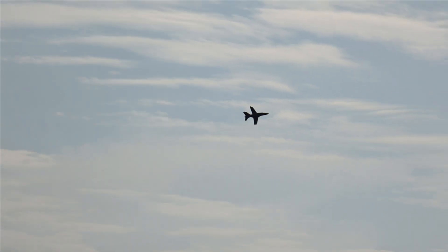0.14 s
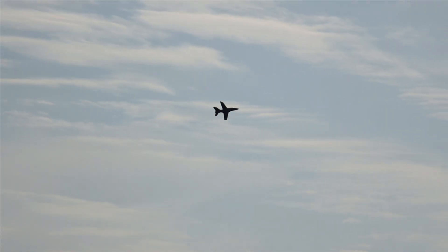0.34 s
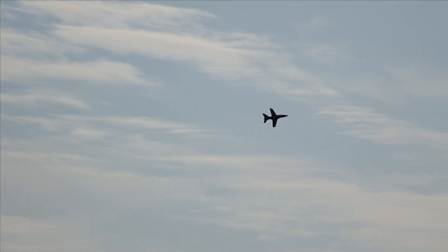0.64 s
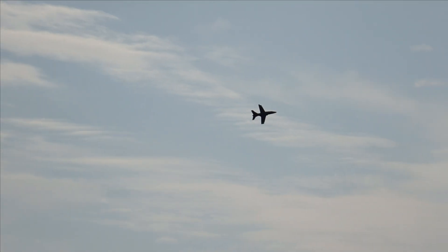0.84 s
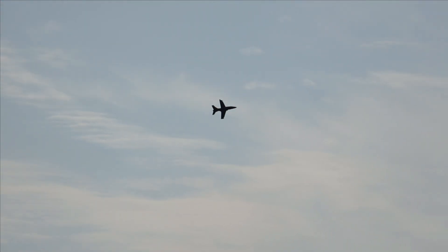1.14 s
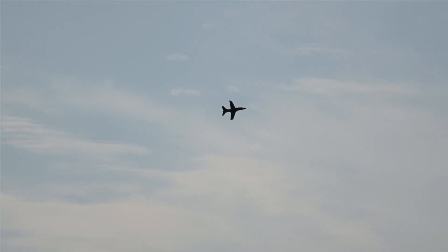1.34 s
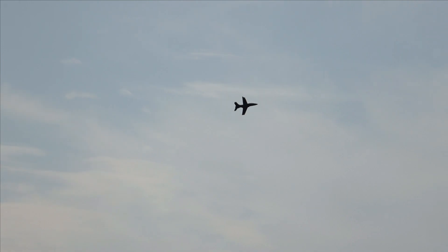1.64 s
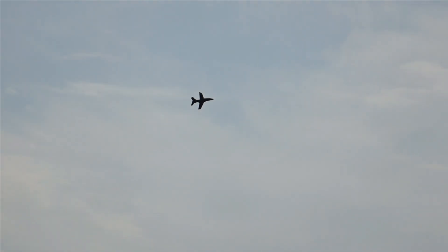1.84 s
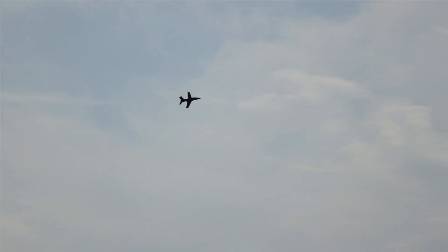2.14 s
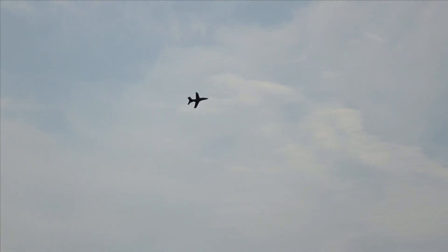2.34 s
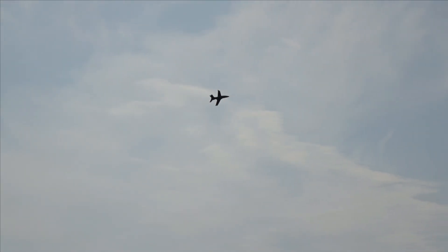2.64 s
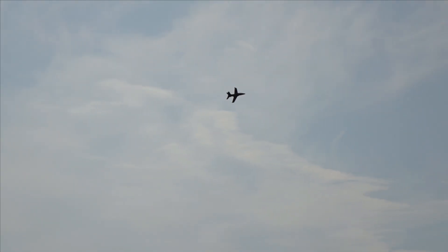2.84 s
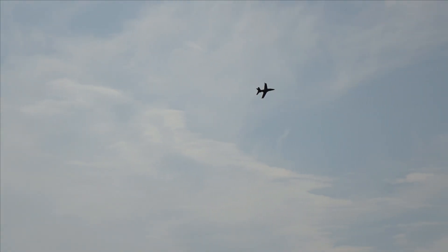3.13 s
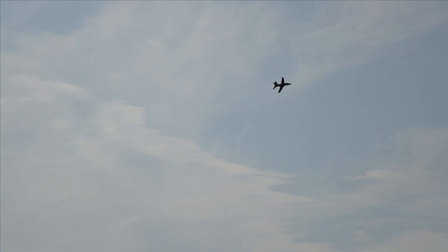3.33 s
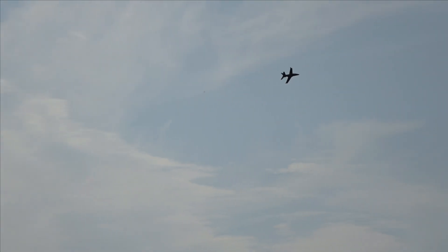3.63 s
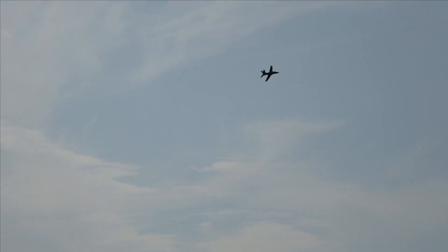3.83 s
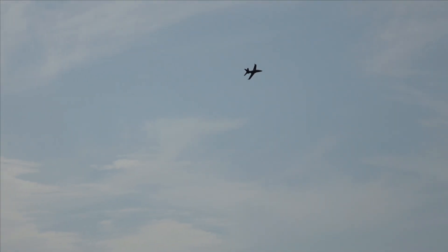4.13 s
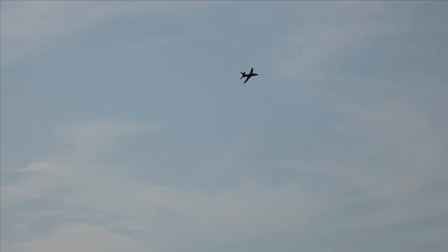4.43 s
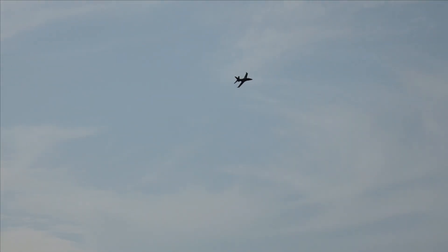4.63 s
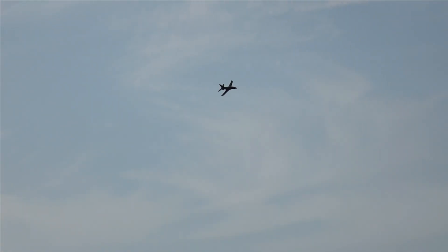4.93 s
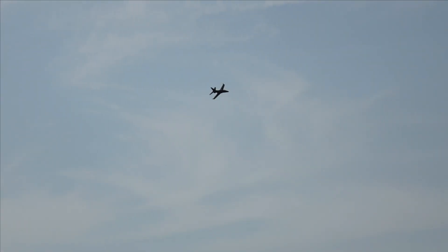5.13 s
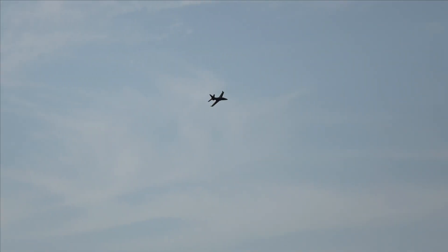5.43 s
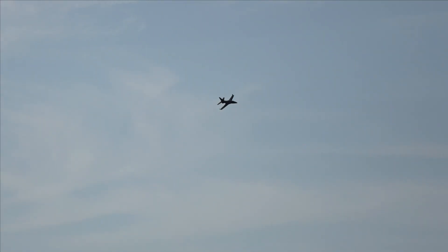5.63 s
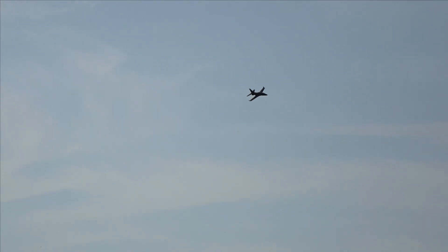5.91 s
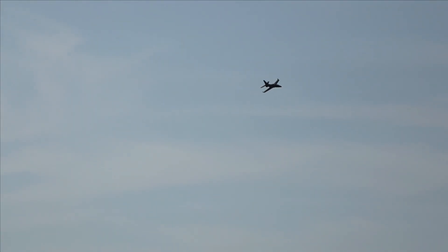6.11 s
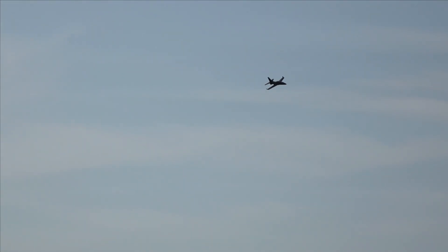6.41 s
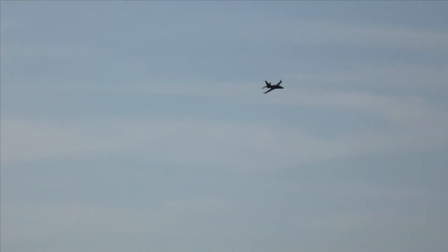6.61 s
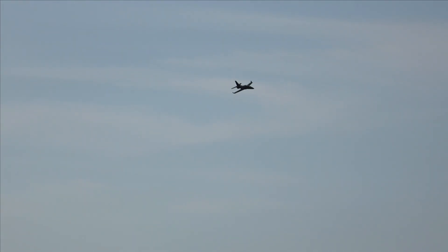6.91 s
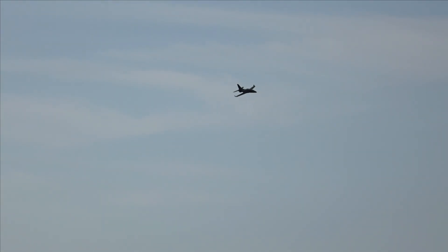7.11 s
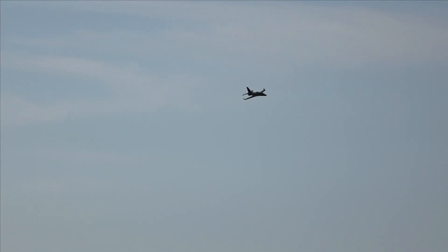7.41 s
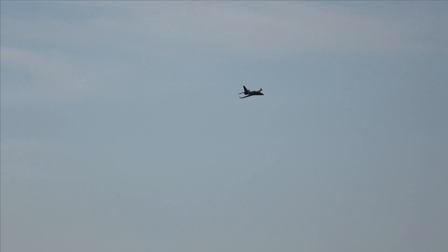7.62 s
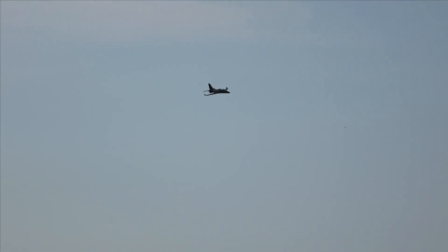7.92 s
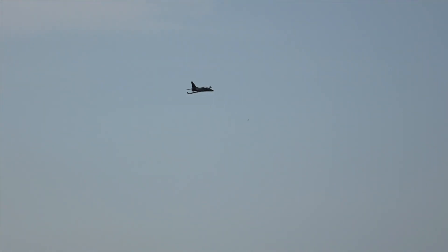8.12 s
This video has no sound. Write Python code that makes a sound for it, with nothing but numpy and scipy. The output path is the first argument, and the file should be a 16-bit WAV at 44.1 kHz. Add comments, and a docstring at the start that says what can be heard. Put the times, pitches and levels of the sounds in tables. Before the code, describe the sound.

A distant turbine-powered model jet flies over an open field with a wavering, rushing roar and faint thin whine, while wind buffets the microphone.

```python
"""First a wavering broadband roar: a turbine-powered model jet flies by high over an open field.
Its exhaust is shaped noise in drifting bands, notched by close reflections; thin sine whines sink in pitch.
Near the hand-held camera, wind noise and pressure swings buffet the microphone.
Short noise bursts tick through resonances of the camera body; faint swells of high hiss lie behind."""
import sys
import numpy as np
from scipy import signal
from scipy.fft import rfft, irfft
from scipy.io import wavfile

SR = 44100
rng = np.random.default_rng(int(sys.argv[2]) if len(sys.argv) > 2 else 0)


def int16_out(signal):
    """Quantize to a 16-bit WAV file."""
    q = np.round(np.clip(np.atleast_2d(signal).T, -1, 1) * 32767)
    wavfile.write(sys.argv[1], SR, q.astype(np.int16))


N = 364266
TIME = np.arange(N) / SR  # s
FREQS = np.maximum(np.arange(N // 2 + 1) * SR / N, 1)  # Hz

# exhaust spectrum before band levels: f/Hz, relative density/dB
EXHAUST_COLOUR = [(60, -26), (280, -23.5), (520, -12), (780, 1.5), (930, 2.2), (1080, 0.2), (1450, -10),
                  (1780, -7.4), (2050, -5.5), (2400, -8), (2620, -8.5), (2830, -11.5), (3050, -12.5),
                  (3300, -13.5), (3850, -13.5), (4200, -19.5), (4900, -21.5), (5850, -23.5), (6350, -29),
                  (7000, -31.5), (7600, -40), (8300, -41.5), (9500, -55)]
# exhaust levels before the trims in exhaust(): roar near 1 kHz, rush near 2 kHz,
# hiss at 3-4 kHz, sizzle at 6-7.5 kHz; each t/s, level/dB
ROAR_LEVEL = [(0.0, -35.5), (0.53, -37), (0.64, -34), (0.94, -38.5), (1.17, -33.5), (1.38, -40.5),
              (1.45, -38), (1.72, -39.5), (1.98, -36), (2.37, -40), (2.9, -38.5), (3.45, -38), (4.12, -39),
              (6.23, -34), (6.65, -28.5), (6.74, -31.5), (7.2, -32), (7.98, -32), (8.26, -28.5)]
RUSH_LEVEL = [(0, -41.5), (.2, -40), (.4, -44), (.7, -44.5), (1.25, -47.5), (1.48, -40), (1.85, -46.5),
              (1.98, -43.5), (2.38, -50.5), (2.8, -49), (4.0, -41.5), (4.15, -44.5), (4.43, -45),
              (5.3, -46.5), (5.75, -40.5), (6.3, -41), (6.52, -35.5), (6.89, -37.5), (7.28, -36),
              (8.26, -40)]
HISS_LEVEL = [(0, -49.5), (.38, -54), (.6, -54.5), (.68, -46), (.73, -49.5), (.8, -47.5), (.88, -53),
              (1.0, -53.5), (1.13, -50), (1.3, -53), (1.5, -56), (1.86, -52.5), (1.98, -46.5), (2.08, -55),
              (2.4, -57.5), (2.72, -50), (2.83, -56.5), (2.95, -49.5), (3.06, -56), (3.42, -52),
              (3.73, -55), (3.95, -49), (4.06, -54.5), (4.25, -49), (4.58, -54.5), (4.69, -46.5),
              (4.82, -47.5), (5.03, -53), (5.13, -48), (5.48, -45.5), (5.6, -48), (6.2, -49), (7.03, -47.5),
              (7.22, -43.5), (7.6, -45.5), (8.26, -43.5)]
SIZZLE_LEVEL = [(0, -60.5), (.3, -70.5), (.53, -65.5), (.6, -69), (.69, -63.5), (.89, -73), (1.13, -70),
                (1.44, -75), (1.9, -70.5), (1.98, -65), (2.07, -70.5), (2.55, -73.5), (2.78, -64),
                (2.95, -62), (3.59, -66.5), (4.15, -63), (4.3, -63), (4.9, -61.5), (5.1, -64), (5.7, -60.5),
                (5.82, -59.5), (6.15, -58), (6.4, -56.5), (6.55, -57.5), (6.74, -54.5), (7.141, -55.5),
                (7.29, -51), (7.49, -57), (7.82, -53.5), (8.06, -59.5), (8.15, -50), (8.26, -56)]
# lean of the roar's hump to its low or high side: t/s, slope/(dB per octave)
ROAR_TILT = [(0, 7), (1.2, -1.5), (2.6, -6), (3.1, -7), (3.6, -1.5), (4.1, -2), (4.7, 7), (5.4, 9), (6, -2),
             (7, 5), (8.26, 1)]
# level added to the low body of the roar, in full at 450 Hz and below: t/s, level/dB
LOW_BODY_LEVEL = [(0, 11.5), (.5, 3), (1.0, -3), (1.6, -3.5), (2.5, -7), (3.1, -1.5), (4.1, -0.5),
                  (4.7, 5.5), (5.5, 9), (6.1, -4), (7.1, 1), (7.6, 5), (8.26, 2)]
# place of the roar: t/s, left minus right/dB
ROAR_PLACE = [(0, 2.3), (1.1, 1.5), (2.5, -0.5), (6.5, -0.5), (7.5, -1), (8.26, 0)]
# reflection behind the direct sound: t/s, lag/ms, strength (0-1)
REFLECTION = [(0, 0.88, 0.31), (.8, 0.88, 0.26), (1.4, 0.95, 0.42), (2.3, 0.91, 0.33), (3.0, 0.99, 0.17),
              (3.6, 1.12, 0), (4.2, 1.52, 0.2), (4.9, 1.51, 0.49), (5.5, 1.56, 0.33), (5.9, 1.8, 0),
              (6.5, 2.08, 0.28), (7.2, 1.92, 0.02), (8.26, 2, 0.19)]
# shorter reflection, strongest late in the pass: t/s, lag/ms, strength (0-1)
SHORT_REFLECTION = [(6.3, 0.62, 0.14), (7.2, 0.72, 0.2), (7.7, 0.67, 0.43), (8.26, 0.65, 0.34)]

# exhaust at the two microphone ports: f/Hz, left-right correlation (0-1)
PORT_LIKENESS = [(100, .9), (1000, .96), (2000, .92), (3000, .78), (4200, .55), (7000, .45), (9000, .1)]
# exhaust at the two microphone ports: f/Hz, left lead/rad
PORT_LEAD = [(100, 0), (700, .15), (1300, .3), (2000, -.65), (2580, -1.5), (3360, -.8), (4300, -2.3),
             (5250, -1.7), (6200, .3), (7100, -.2), (8000, -2.0)]
# exhaust at the two microphone ports: f/Hz, left minus right/dB
PORT_BALANCE = [(100, 0), (600, -2.3), (1400, -2.6), (2050, 0), (2700, -2.3), (3300, 2), (3850, 6),
                (4300, 1.5), (4900, 7), (5700, -.5), (6500, -1.5), (7800, 3), (10000, -2)]

# turbine whines, low to high: start f/Hz, end f/Hz, glide start t/s, glide time/s,
# left minus right/dB added to the shared place, left lead/rad
WHINES = [(5389, 5188, 1.7, 1.22, 3, -1.7), (5523, 5286, 1.6, 1.22, 0, -1.4),
          (5598, 5350, 1.65, 1.22, 0, -1.2), (5615, 5523, 2.5, 1.85, -2.5, -.8)]
# shared place of the whines: t/s, left minus right/dB
WHINE_PLACE = [(0, -11), (2.6, -17), (3.3, -14.5), (4.2, -1), (5.2, 6), (6.2, 13), (8.26, 12)]
# lowest whine between dropouts, before the trim in turbine(): start t/s, end t/s, level/dB
LOW_WHINE_SWELLS = [(.6, .85, -59), (1.03, 1.5, -65), (1.53, 1.88, -55), (1.9, 2.15, -59), (2.2, 2.32, -61),
                    (2.7, 3.12, -63), (3.2, 3.62, -58), (3.74, 3.9, -54), (3.92, 4.15, -48),
                    (4.12, 4.35, -55), (4.45, 4.85, -49), (4.84, 5.03, -50), (5.05, 5.2, -58),
                    (5.21, 5.52, -51), (5.78, 6.25, -48.5), (6.1, 6.52, -52.5), (6.56, 6.89, -53),
                    (6.89, 7.07, -52.5), (7.08, 7.46, -48.5), (7.51, 7.85, -44), (7.75, 7.97, -52),
                    (8.0, 8.35, -48)]
# second, third and highest whine, before the same trim: each t/s, level/dB
MIDDLE_WHINE_LEVEL = [(0, -59), (.5, -60), (.75, -74), (1.25, -62), (1.55, -62), (1.75, -71), (1.95, -59),
                      (2.2, -70), (2.55, -60), (2.85, -59.5), (3.0, -66), (3.2, -53), (3.45, -67),
                      (3.8, -57), (4.0, -56), (4.3, -55), (4.6, -66), (4.9, -62), (5.45, -59), (6.25, -65),
                      (7.0, -56), (7.35, -49), (7.6, -63), (8.26, -57)]
FAINT_WHINE_LEVEL = [(1.8, -78), (2.1, -67), (2.5, -72), (2.75, -63), (3.2, -61), (3.45, -74), (3.901, -60),
                     (4.5, -81), (6.9, -58), (8.26, -70)]
HIGH_WHINE_LEVEL = [(0, -75), (1.9, -81), (2.6, -72), (2.82, -61), (3.35, -70), (3.55, -78), (3.8, -70),
                    (4.85, -57), (5.0, -65), (5.2, -55), (5.7, -59.5), (5.9, -78), (6.6, -62), (6.95, -56),
                    (7.2, -66), (7.6, -66), (8.26, -70)]
GLIDE_SHAPE = 1.65  # exponent of the glide curve
SHAFT_HZ, SHAFT_DB, SHAFT_PEAK_S, SHAFT_FADE_DB_PER_S = 1431, -40, 7.54, 13

# gusts at the microphone, before the trim in gustiness(): start t/s, length/s, level/dB
GUSTS = [(1.005, 0.028, -37), (1.332, 0.033, -45), (1.883, 0.092, -40.5), (1.98, 0.025, -36.5),
         (2.02, 0.046, -40.5), (2.09, 0.033, -34), (2.184, 0.13, -37), (2.305, 0.03, -38),
         (2.369, 0.099, -38.5), (2.547, 0.03, -42), (2.599, 0.03, -41), (2.806, .12, -36),
         (2.94, 0.044, -33), (3.202, 0.15, -34), (3.395, 0.068, -31), (3.536, 0.15, -31.5),
         (3.837, 0.041, -36.5), (4.079, 0.077, -37), (4.224, 0.019, -41), (4.33, 0.071, -38),
         (4.45, 0.12, -32), (4.638, 0.084, -32.5), (4.846, 0.095, -38.5), (5.15, 0.08, -41),
         (5.307, 0.058, -31), (5.41, 0.09, -30.5), (5.573, 0.18, -37), (6.198, 0.12, -36),
         (6.396, 0.19, -31.5), (6.692, 0.045, -35), (6.89, 0.13, -32.5), (6.996, 0.1, -33),
         (7.26, 0.34, -33), (7.705, 0.18, -30.5), (7.958, 0.14, -27.5), (8.07, .2, -28)]
# breeze between the gusts: t/s, level/dB
BREEZE = [(0, -59), (.7, -63), (.95, -50), (1.15, -59), (1.55, -54.5), (1.78, -55.5), (2.2, -46),
          (5.7, -51), (5.9, -71), (6.1, -67), (6.25, -43.5), (7.66, -43.5), (8.1, -42), (8.26, -24)]
# colour of the wind before scaling: f/Hz, relative density/dB
WIND_COLOUR = [(12, -61), (25, -25), (40, -17.5), (70, -4), (120, 0), (200, -2), (300, -9), (420, -14.5),
               (700, -27.5), (1500, -58)]
# strong single eddies: t/s, peak level/dB before the left-right spread, centre f/Hz
EDDIES = [(0.938, -34, 170), (1.001, -26, 230), (1.014, -31.5, 200), (1.078, -36, 200), (1.371, -31, 160),
          (2.114, -25, 193.5), (2.193, -30.5, 190), (2.434, -27, 213), (2.554, -26, 168),
          (2.794, -26.5, 180), (2.864, -28.5, 278), (2.948, -22.5, 190), (3.008, -29, 250),
          (3.317, -23.5, 199), (3.409, -21.5, 211), (3.457, -26.5, 239), (3.536, -20.5, 288),
          (3.573, -17, 225), (3.617, -23, 203), (3.68, -25, 171), (3.818, -33, 220), (4.168, -25.5, 185),
          (4.236, -29.5, 213), (4.5, -26, 190), (4.558, -28, 178.4), (4.643, -25, 184), (4.96, -27.5, 190),
          (5.15, -32, 169), (5.317, -26.5, 211), (5.412, -22, 262), (5.438, -20.5, 275), (5.476, -23, 200),
          (5.514, -24, 221), (5.577, -25, 207), (6.2, -29.5, 210), (6.26, -24, 210), (6.303, -28, 164),
          (6.389, -27, 201), (6.418, -24, 242), (6.515, -27, 200), (6.756, -19.5, 256), (6.921, -21.5, 192),
          (7.005, -24, 273), (7.151, -26.5, 180), (7.396, -31, 174), (7.554, -22.5, 225),
          (7.853, -22.5, 243), (7.952, -26, 175), (7.999, -19, 182), (8.031, -21, 205), (8.065, -22, 200),
          (8.102, -22.5, 225), (8.182, -20.5, 202), (8.235, -29, 253), (8.2418, -10, 272)]
GUST_ATTACK_S, GUST_RELEASE_S = 0.024, 0.055  # time for a factor e in gain

# ticks of the camera body, before the trim in ticks():
# t/s, rms level over the decay time/dB, decay/ms, centre f/Hz
TICKS = [(.3225, -15.3, 1.1, 6000), (.3229, -24.5, 1.2, 1450), (.3245, -27, .7, 3500),
         (1.9805, -28.5, 1.8, 2000), (1.982, -44, 3, 7500), (1.9855, -29.5, 2.5, 1500),
         (2.706, -29, .6, 1800), (2.7058, -43, .6, 7500), (2.7106, -26.5, 1.2, 2100),
         (2.7155, -31, .6, 8000), (2.7155, -32, .7, 2100), (2.7532, -31, .7, 2100), (2.7532, -46, .6, 8000)]
# resonances of the camera body: f/Hz, width/Hz, level/dB
BODY_MODES = [(980, 260, 2), (2080, 440, 11.5), (3800, 600, 3), (5250, 490, 7), (6470, 310, 2),
              (7500, 280, -2.5), (8500, 150, -18), (10700, 800, -14)]
TICK_RISE_SHARE = .6  # rise time as a share of the decay time
TICK_OCTAVES = 0.67  # spread around the centre

# swells of high hiss: start t/s, end t/s, level/dB before the arch, centre f/Hz,
# width of each of two filter passes/Hz, left minus right/dB
SWISHES = [(0.298, 0.584, -62, 8450, 3500, -5), (2.686, 2.78, -64, 8000, 4000, -11),
           (3.026, 3.34, -68, 7800, 3500, -4), (4.236, 4.9, -67.5, 8200, 2500, 0),
           (7.03, 7.703, -71, 10500, 900, -22)]
TOP_HZ = 11050  # upper edge of the camera's sound


def undb(db):
    """Decibels to gain."""
    return 10 ** (np.asarray(db) / 20)


def unit(x):
    """Scale to rms 1."""
    return x / np.sqrt(np.mean(x ** 2))


def curves(table):
    """Each column of a time table, joined by straight lines."""
    s, *columns = np.transpose(table)
    return [np.interp(TIME, s, column) for column in columns]


def across(table, hz=FREQS):
    """A frequency table read on a log axis."""
    f, value = np.transpose(table)
    return np.interp(np.log(hz), np.log(f), value)


def shape(x, response):
    """Filter by a frequency response."""
    return irfft(rfft(x) * response, N)


def resonance(hz, width):
    """Response of one damped mode, gain 1 at its centre."""
    return 1 / (1 + 1j * (FREQS / hz - hz / FREQS) * hz / width)


def sides(db):
    """Left and right gains for a level difference."""
    return undb(np.array([[1], [-1]]) * db / 2)


def walk(rate):
    """Smooth random drift of rms 1; a higher rate turns more often."""
    steps = np.linspace(0, N / SR, 8192)
    hz = np.arange(len(steps) // 2 + 1) * SR / N
    lowpass = np.exp(-(hz / rate) ** 2) * (hz > 0)
    slow = irfft(rfft(rng.standard_normal(len(steps))) * lowpass)
    return np.interp(TIME, steps, unit(slow))


def noise_pair(likeness):
    """Left and right white noise with a given correlation."""
    c = np.clip(likeness, 0, .995)
    mid, side = rng.standard_normal((2, N))
    return shape(mid, np.sqrt(1 + c)) + np.array([[1], [-1]]) * shape(side, np.sqrt(1 - c))


def band_level(x, lo_hz, hi_hz):
    """Rms of a sound between two frequencies."""
    return np.sqrt(np.mean(shape(x, (FREQS > lo_hz) & (FREQS < hi_hz)) ** 2))


def delayed(x, lag_ms):
    """Both channels read a changing time late."""
    return np.array([np.interp(TIME - lag_ms / 1000, TIME, channel) for channel in x])


def exhaust(roar_db=0.32, rush_db=-0.78, hiss_db=0.34, sizzle_db=1.03, waver_db=0.44, flicker_db=1.0):
    """Jet mixing noise: the treble swells as the nozzle turns nearer, and turbulence makes each band waver."""
    ports = sides(across(PORT_BALANCE)) * np.exp(.5j * np.array([[1], [-1]]) * across(PORT_LEAD))
    spectrum = rfft(noise_pair(across(PORT_LIKENESS))) * undb(across(EXHAUST_COLOUR)) * ports
    steady = irfft(spectrum, N).mean(axis=0)

    # large eddies give the roar, ever smaller ones the rush, hiss and sizzle
    layers = [(ROAR_LEVEL, roar_db, 600, 1400), (RUSH_LEVEL, rush_db, 1700, 2500),
              (HISS_LEVEL, hiss_db, 3000, 4200), (SIZZLE_LEVEL, sizzle_db, 5900, 7500)]
    levels = []
    for table, trim_db, lo_hz, hi_hz in layers:
        steady_db = 20 * np.log10(band_level(steady, lo_hz, hi_hz))
        levels.append(curves(table)[0] + trim_db - steady_db)

    anchors = np.log([1100, 2000, 3500, 6300])  # where each layer's level holds in full
    centres = np.log(np.geomspace(450, 10000, 16))
    lean_octaves = [(500, -.7), (1000, 0), (1350, .55), (1900, 0)]
    low_share = [(450, 1), (700, 0)]
    tilt, low_db = curves(ROAR_TILT)[0], curves(LOW_BODY_LEVEL)[0]
    shared_waver = walk(7.1)
    out = 0
    for centre, pick in zip(centres, np.eye(len(centres))):
        # overlapping bands that add up to the whole spectrum
        band = irfft(spectrum * np.interp(np.log(FREQS), centres, pick), N)
        db = 0
        for share, level in zip(np.eye(len(levels)), levels):
            db = db + np.interp(centre, anchors, share) * level
        db = db + tilt * across(lean_octaves, np.exp(centre))
        db = db + low_db * across(low_share, np.exp(centre))
        out = out + band * undb(db + waver_db * shared_waver + flicker_db * walk(8.7))
    return out


def scattered(x, count=6):
    """Pockets of turbulent air open weak, fleeting side paths, so colours come and go in the roar."""
    share = .12
    out = x
    for lag_ms in np.geomspace(1.1, 5.5, count):
        strength = share * walk(3.5)
        out = out + strength * delayed(x, lag_ms * (1 + .05 * walk(1)))
    return out / np.sqrt(1 + count * share ** 2)


def reflected(x, path, dull_hz=3000, thin_hz=560):
    """A slightly late copy, weak in bass and treble, carves slowly moving notches into the roar."""
    lag_ms, strength = curves(path)
    band = shape(x, 1 / (1 + (FREQS / dull_hz) ** 12) / (1 + (thin_hz / FREQS) ** 8))
    # the sum roughly keeps the loudness of the direct roar, whose power lies near 1 kHz
    overlap = np.cos(2 * np.pi * lag_ms) * np.exp(-.5 * lag_ms ** 2)
    loudness = np.sqrt(1 + strength ** 2 + 2 * strength * overlap)
    return x - band + (band + strength * delayed(band, lag_ms)) / loudness


def turbine(whine_db=-1.05, halo_db=-64):
    """Four close whines glide down to new pitches over a narrow compressor hiss; the shaft adds a lower tone."""
    place = curves(WHINE_PLACE)[0]
    shaft_db = SHAFT_DB - SHAFT_FADE_DB_PER_S * abs(TIME - SHAFT_PEAK_S)
    tones = whine(SHAFT_HZ, shaft_db, pan_db=-5.5, lead=.3)
    levels = [swells(LOW_WHINE_SWELLS)]
    levels += [curves(table)[0] for table in (MIDDLE_WHINE_LEVEL, FAINT_WHINE_LEVEL, HIGH_WHINE_LEVEL)]
    for (start_hz, end_hz, start_s, glide_s, side_db, lead), db in zip(WHINES, levels):
        age = np.maximum(TIME - start_s, 0) / glide_s
        done = 1 - np.exp(-age ** GLIDE_SHAPE)
        hz = start_hz + (end_hz - start_hz) * done
        tones = tones + whine(hz, db + whine_db, place + side_db, lead)
    halo = unit(shape(noise_pair(0.28), resonance(5406, 310) ** 2))
    return tones + halo * undb(halo_db + 1.2 * walk(5.9)) * sides(0.49 * place)


def whine(hz, db, pan_db, lead, jitter_hz=7, fading_db=0.6, apart_db=2.05):
    """One turbine tone: a sine whose pitch trembles and whose level fades in and out with the air."""
    phase = 2 * np.pi * np.cumsum(hz + jitter_hz * walk(70)) / SR
    # one drift is shared, the faster one differs between left and right
    fading = fading_db * walk(8) + apart_db * np.array([walk(20), walk(20)])
    tone = np.sqrt(2) * np.sin(phase + np.array([[lead], [0]]))
    return tone * undb(db + fading) * sides(pan_db)


def swells(table, rest_db=-71, arch=0.7):
    """Level in dB of a tone that swells in arches between dropouts."""
    gain = undb(rest_db)
    for start, end, db in table:
        rise = np.sin(np.pi * np.clip((TIME - start) / (end - start), 0, 1))
        gain = np.maximum(gain, undb(db) * abs(rise) ** arch)
    return 20 * np.log10(gain)


def wind(lumpy_db=3.0, eddy_spread_db=3, eddy_length=1.67, eddy_apart_rad=0.85,
         bass_hz=115, bass_follows=0.37, usual_db=-42):
    """Gusts rumble on the microphone in lumps; the strongest eddies each give one short thump."""
    lumps = unit(undb(lumpy_db * walk(50)))
    likeness = across([(60, 0.84), (140, 0.88), (280, 0.062)])
    rumble = unit(shape(noise_pair(likeness) * lumps, undb(across(WIND_COLOUR))))
    # faster air sheds quicker eddies, so the deep bass grows less than the rest
    strength = gustiness()
    bass = shape(rumble, 1 / (1 + (FREQS / bass_hz) ** 4))
    bass_strength = undb(usual_db) * (strength / undb(usual_db)) ** bass_follows
    out = (rumble - bass) * strength + bass * bass_strength
    for (s, db, hz), (pan, turn, apart) in zip(EDDIES, rng.standard_normal((len(EDDIES), 3))):
        # a passing eddy is one brief swing of pressure, a little different at each port
        u = np.pi * hz * (TIME - s)
        near = abs(u) < 10
        port_phase = np.array([[.5], [-.5]]) * eddy_apart_rad * apart
        swing = np.cos(2 * u[near] + np.pi * turn + port_phase)
        envelope = np.exp(-(u[near] / eddy_length) ** 2)
        out[:, near] += undb(db) * swing * envelope * sides(eddy_spread_db * pan)
    return out


def gustiness(gust_db=-3.0):
    """Strength of the wind: each gust rises, holds and dies away over the breeze."""
    power = undb(curves(BREEZE)[0]) ** 2
    for start, length, db in GUSTS:
        before = np.maximum(start - TIME, 0) / GUST_ATTACK_S
        after = np.maximum(TIME - start - length, 0) / GUST_RELEASE_S
        power = np.maximum(power, (undb(db + gust_db) * np.exp(-before - after)) ** 2)
    return np.sqrt(power)


def ticks(pan_db=-4, ticks_db=-3.5):
    """Short scrapes of plastic ring the camera body: hard contacts snap high, soft ones knock low."""
    body = sum(undb(db) * resonance(hz, width) for hz, width, db in BODY_MODES)
    scrape, out = noise_pair(.9), 0
    for s, db, decay_ms, hz in TICKS:
        age = (TIME - s) * 1000 / decay_ms
        burst = scrape * np.exp(-np.minimum(np.maximum(age, -age / TICK_RISE_SHARE), 50))
        # a nearly flat push lets the body and the tick's centre set the colour
        push = rfft(burst)
        push = push / np.sqrt(abs(push) ** 2 + np.mean(abs(push) ** 2) / 10)
        hardness = np.exp(-.5 * (np.log2(FREQS / hz) / TICK_OCTAVES) ** 2)
        tick = irfft(push * body * hardness, N)
        rms = np.sqrt(np.sum(tick.mean(axis=0) ** 2) / (decay_ms * SR / 1000))
        out = out + tick * undb(db + ticks_db) / rms
    return out * sides(pan_db)


def swishes(floor_db=-75, uneven_db=2.0, grain_db=1.0):
    """Soft, grainy swells of high hiss over the microphone's steady self-noise."""
    out = unit(noise_pair(.1)) * undb(floor_db)
    for start, end, db, hz, width, pan_db in SWISHES:
        swell = np.sin(np.pi * np.clip((TIME - start) / (end - start), 0, 1))
        swell = swell * unit(undb(uneven_db * walk(18) + grain_db * walk(160)))
        hiss = unit(shape(noise_pair(0.16), resonance(hz, width) ** 2))
        out = out + hiss * swell * undb(db) * sides(pan_db)
    return out


def scene():
    """The jet overhead, with wind and small noises close to the camera."""
    roar = scattered(exhaust())
    roar = reflected(reflected(roar, REFLECTION), SHORT_REFLECTION)
    roar = roar * sides(curves(ROAR_PLACE)[0])
    return roar + turbine() + wind() + ticks() + swishes()


def record(dry):
    """The camera cuts the top steeply with an elliptic low-pass."""
    return signal.sosfilt(signal.ellip(10, .2, 80, TOP_HZ, fs=SR, output="sos"), dry)


dry = scene()
out = record(dry)
int16_out(out)
```